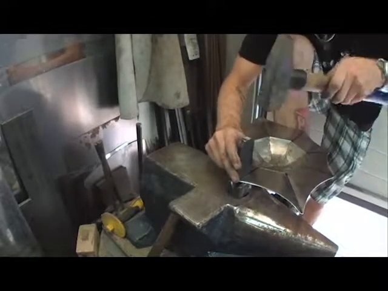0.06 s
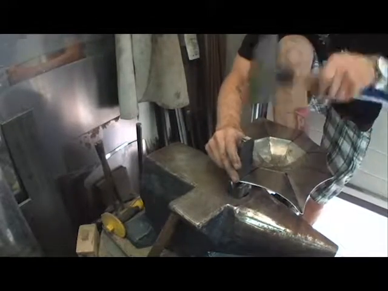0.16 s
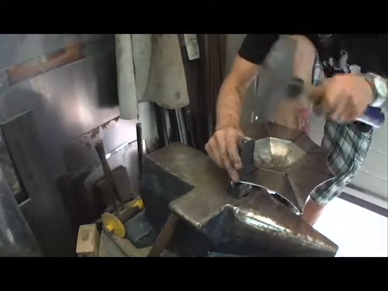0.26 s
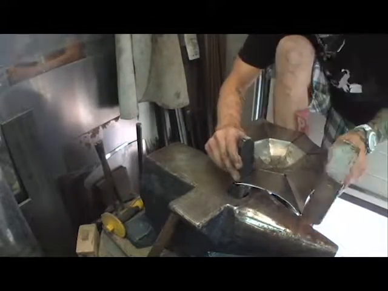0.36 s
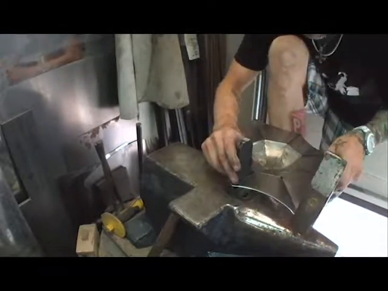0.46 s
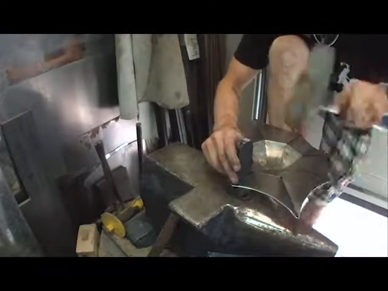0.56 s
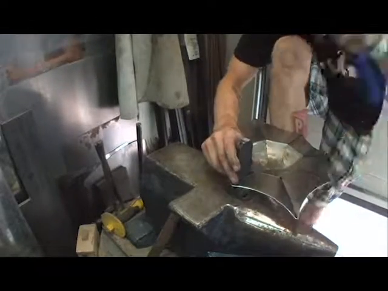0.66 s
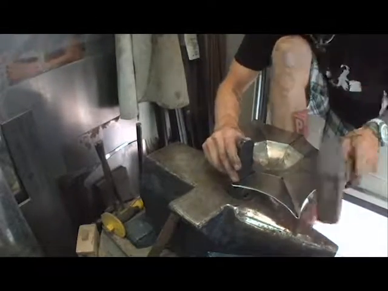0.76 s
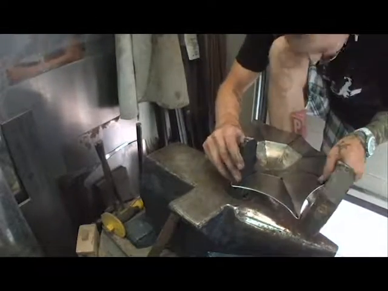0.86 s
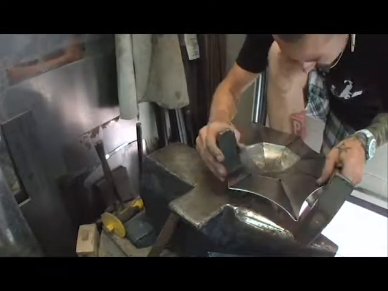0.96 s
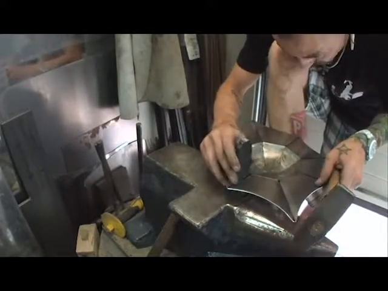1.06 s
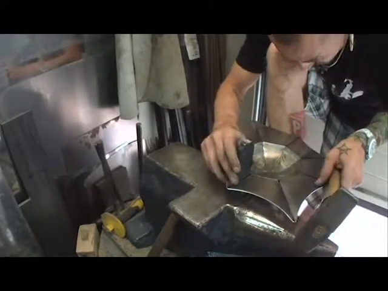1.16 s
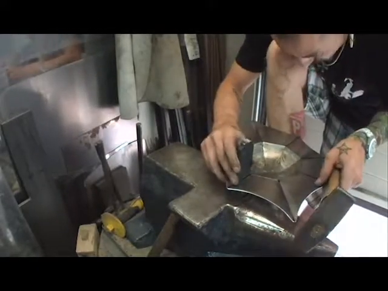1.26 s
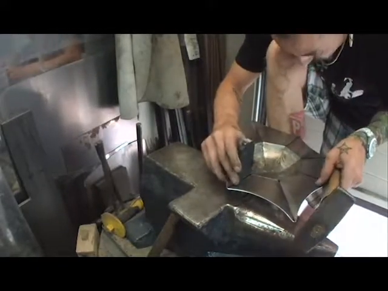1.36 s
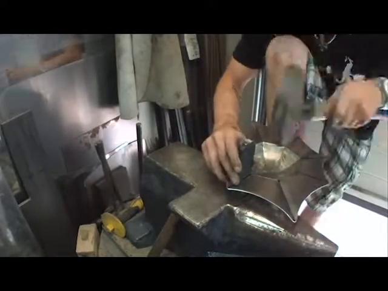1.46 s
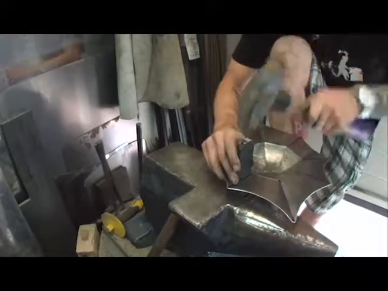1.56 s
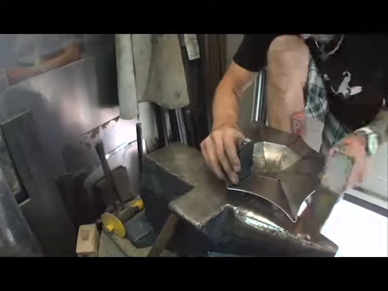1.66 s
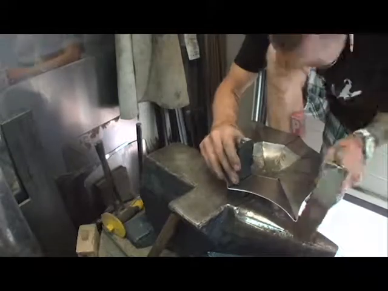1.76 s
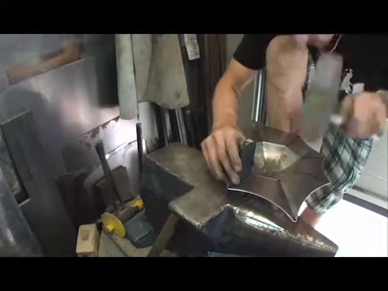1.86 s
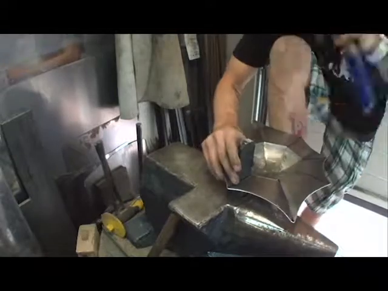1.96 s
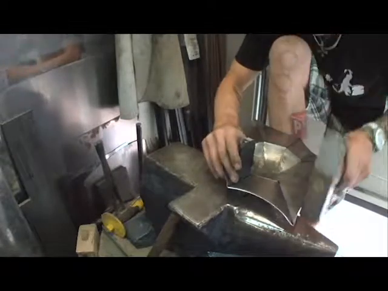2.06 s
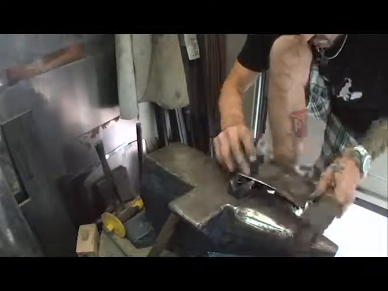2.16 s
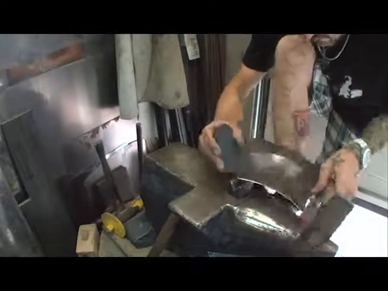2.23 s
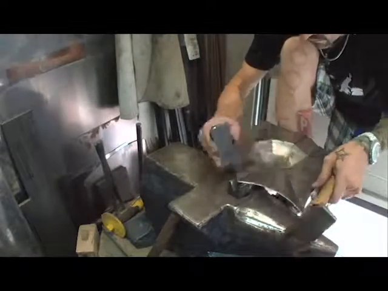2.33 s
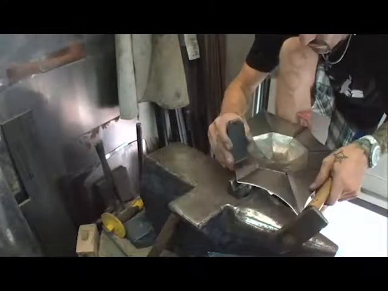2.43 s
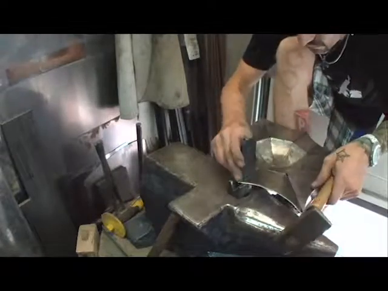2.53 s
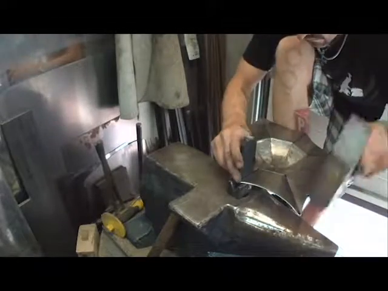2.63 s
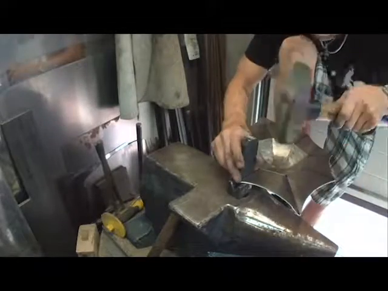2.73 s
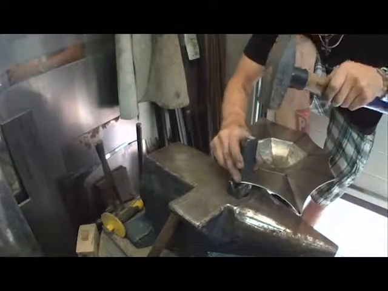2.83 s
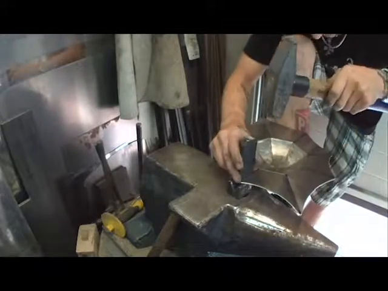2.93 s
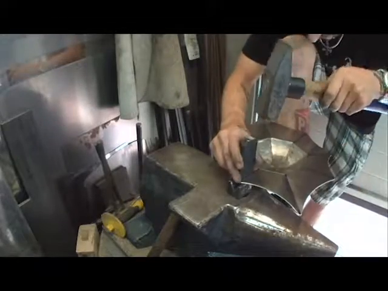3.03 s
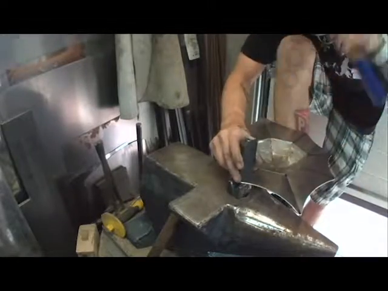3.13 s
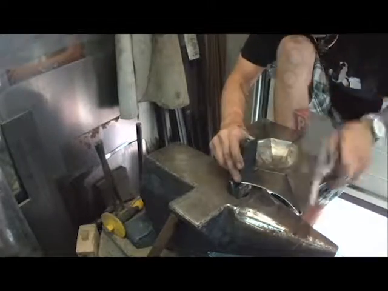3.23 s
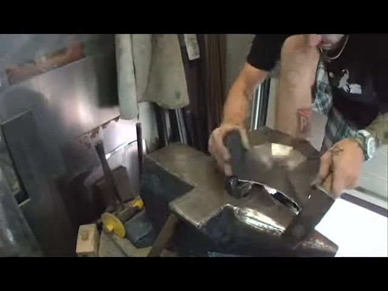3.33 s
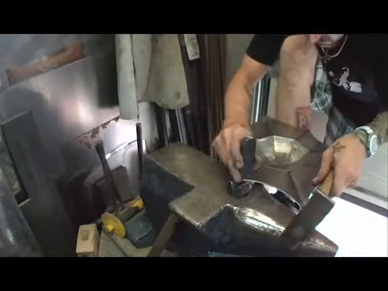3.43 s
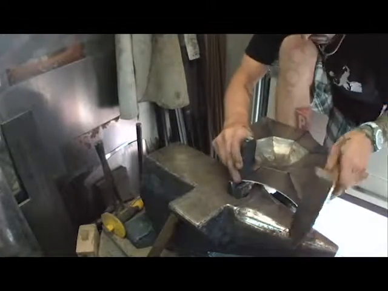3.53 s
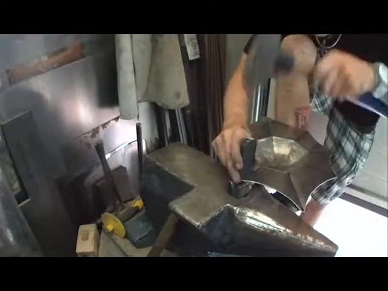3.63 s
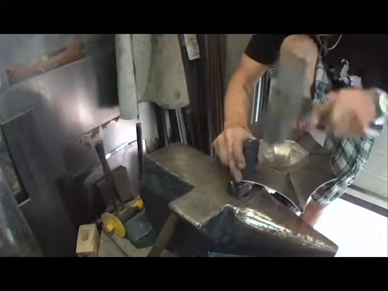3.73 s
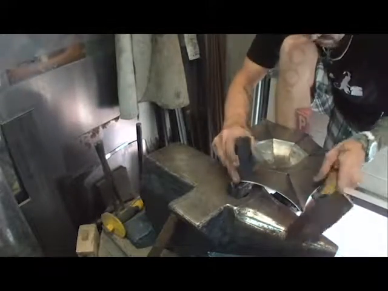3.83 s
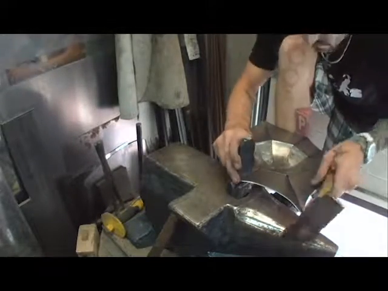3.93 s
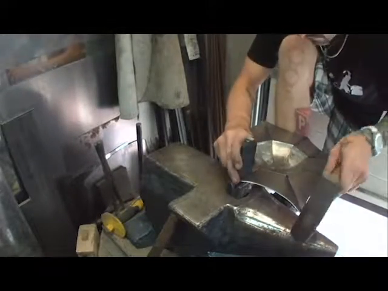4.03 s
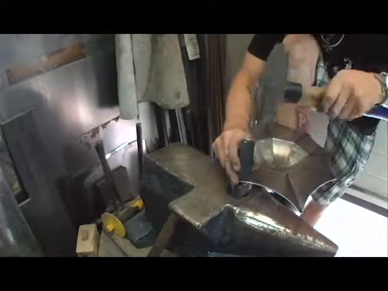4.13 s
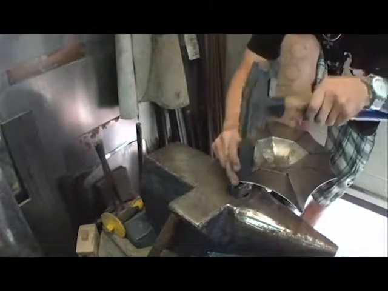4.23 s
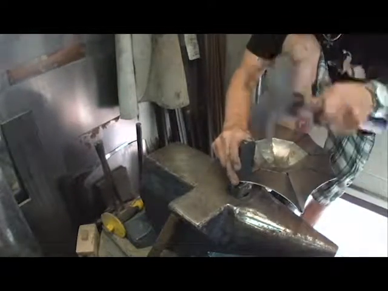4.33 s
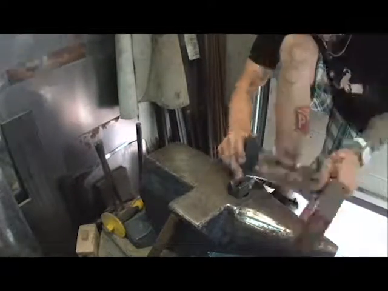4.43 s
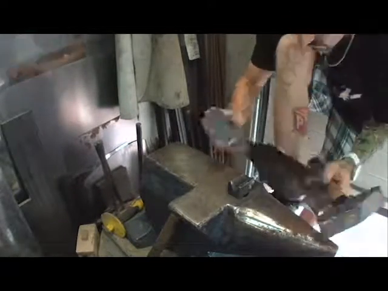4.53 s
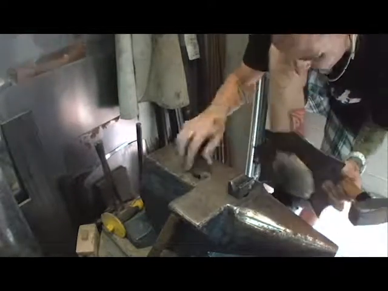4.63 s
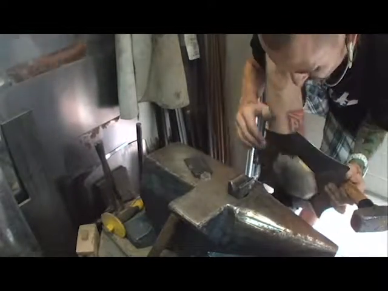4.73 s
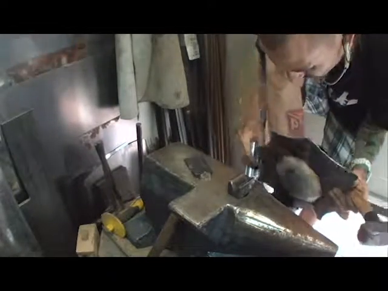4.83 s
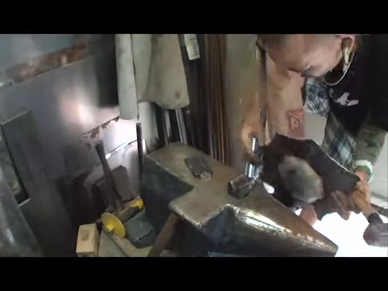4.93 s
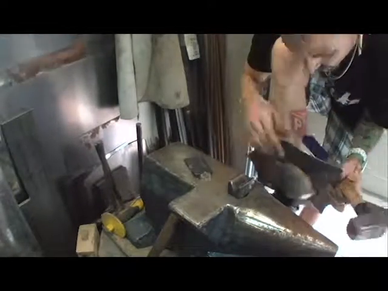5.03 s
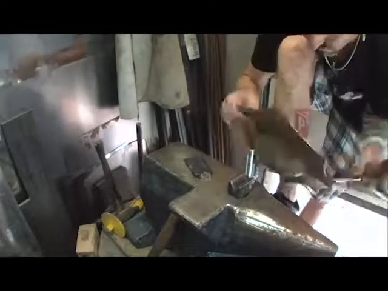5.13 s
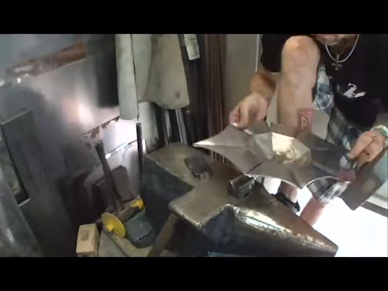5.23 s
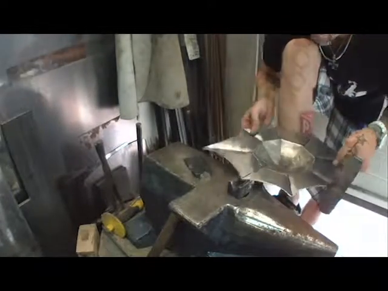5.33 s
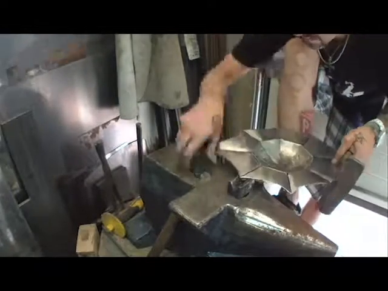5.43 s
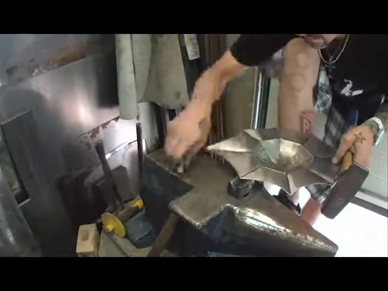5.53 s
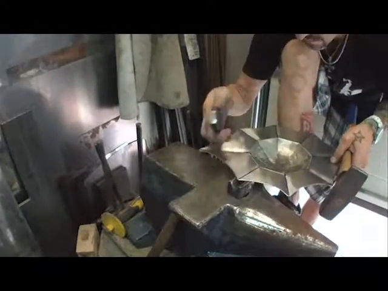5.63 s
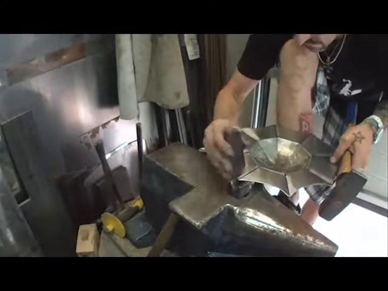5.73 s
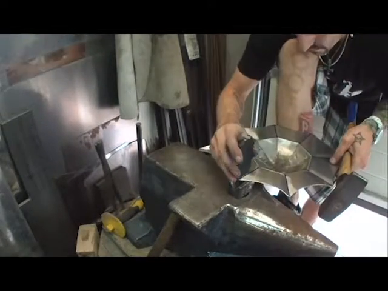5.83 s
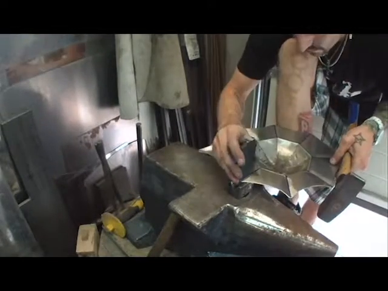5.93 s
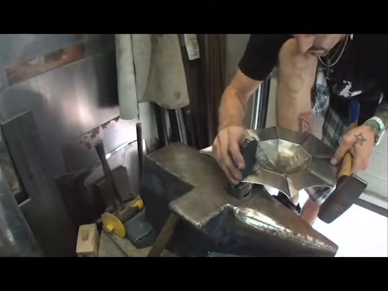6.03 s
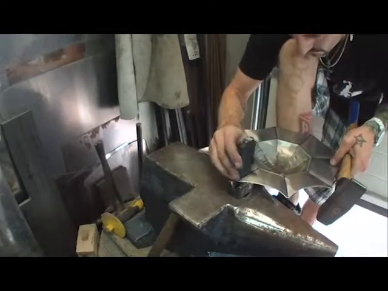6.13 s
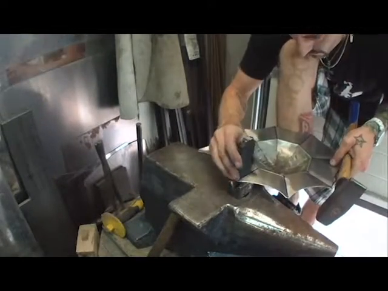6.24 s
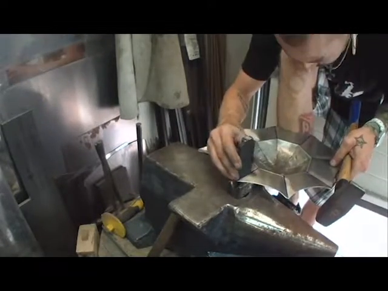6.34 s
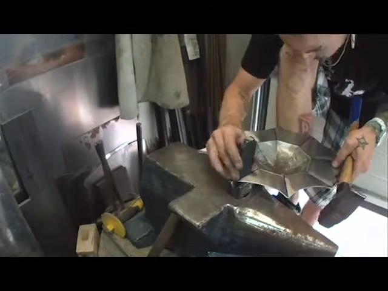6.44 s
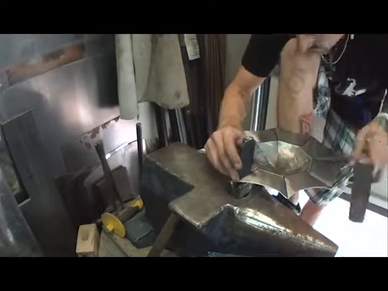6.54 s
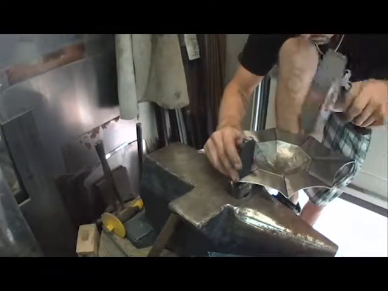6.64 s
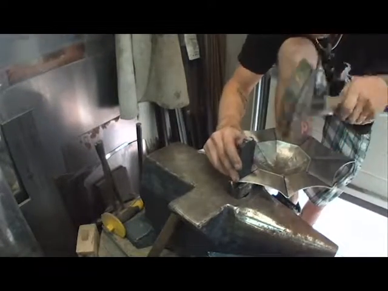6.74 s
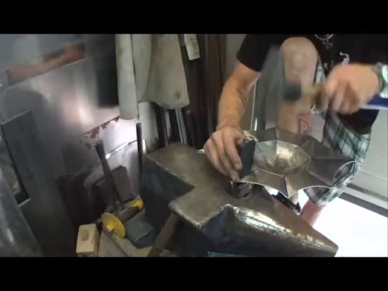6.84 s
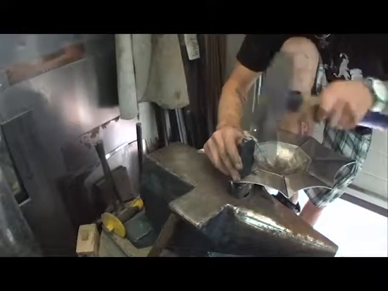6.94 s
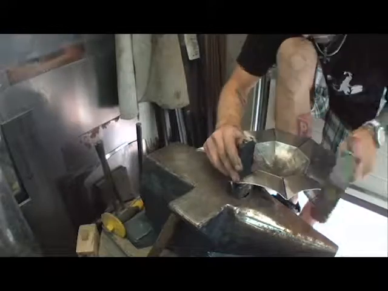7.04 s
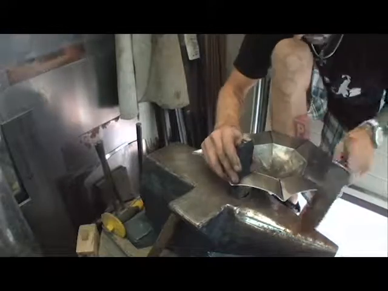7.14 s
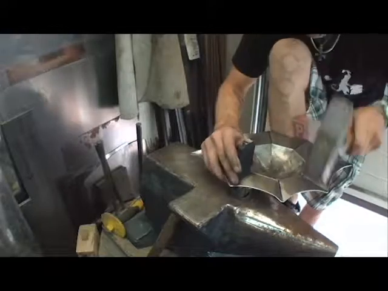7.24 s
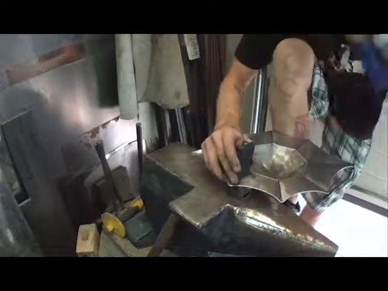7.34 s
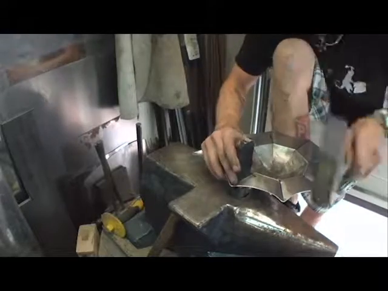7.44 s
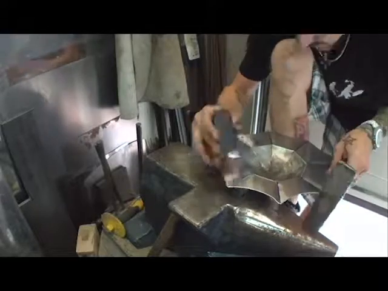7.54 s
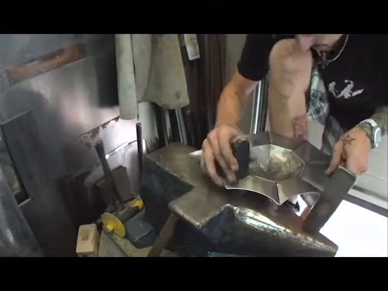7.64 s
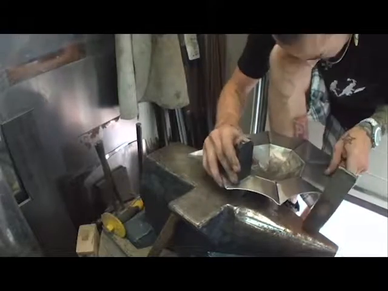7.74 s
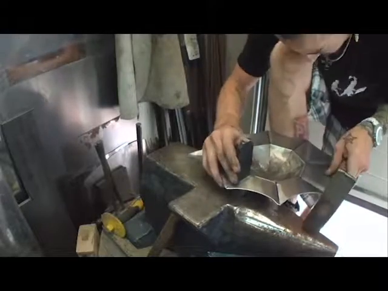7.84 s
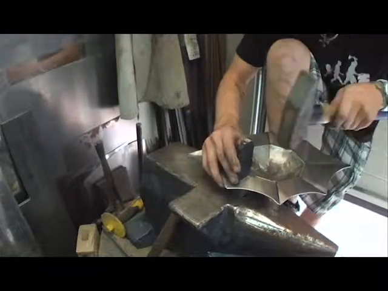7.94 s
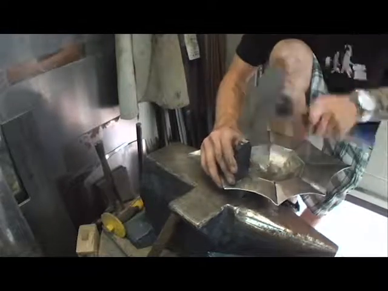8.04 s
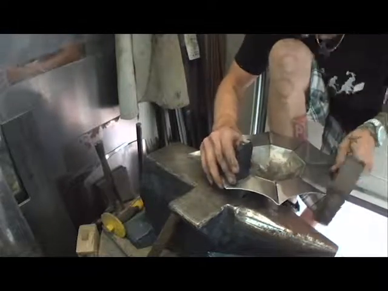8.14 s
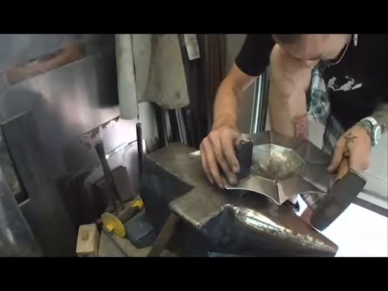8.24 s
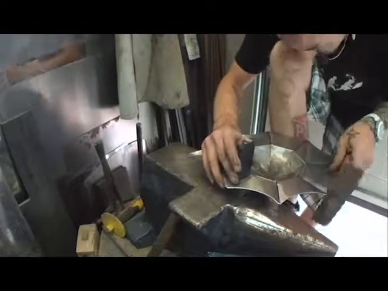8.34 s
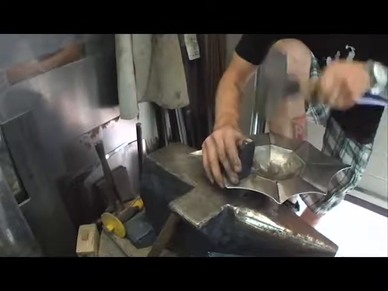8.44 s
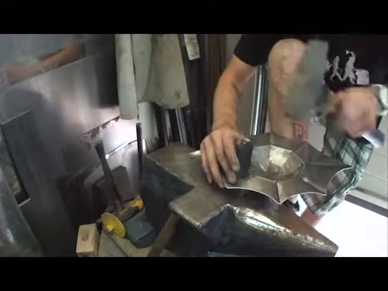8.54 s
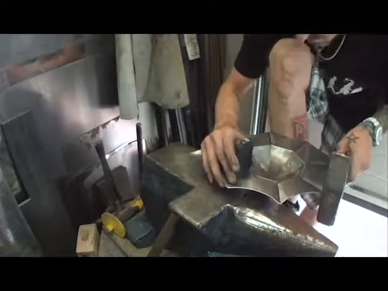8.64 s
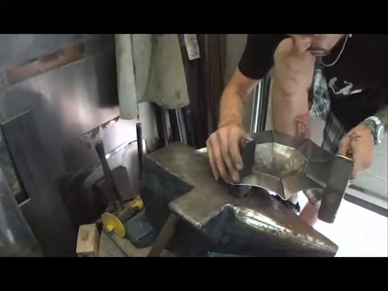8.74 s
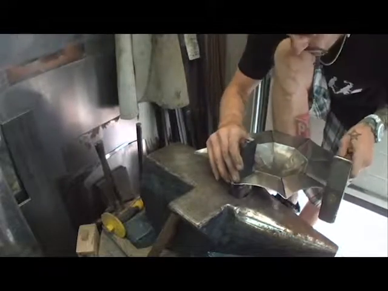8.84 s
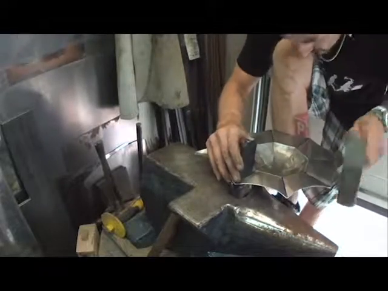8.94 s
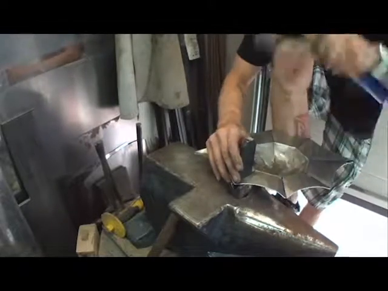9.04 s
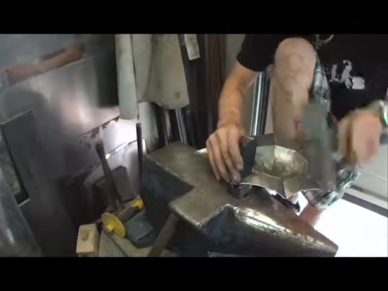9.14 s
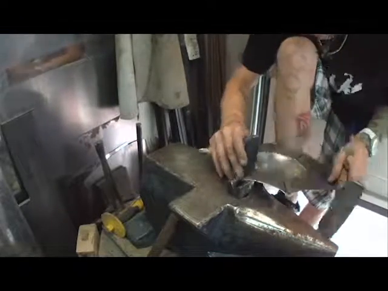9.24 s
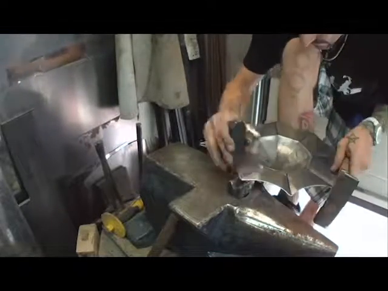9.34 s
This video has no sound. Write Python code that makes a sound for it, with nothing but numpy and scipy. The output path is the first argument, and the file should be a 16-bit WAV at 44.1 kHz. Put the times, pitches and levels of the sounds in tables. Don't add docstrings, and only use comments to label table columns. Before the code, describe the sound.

Irregular loud metal strikes in a small workshop: a dry, crunchy, flattened attack, a dense tinny sheet rattle, a short low thud from the anvil's stump and a faint lingering ring. Lighter clinks from the rebounding punch fill the gaps. Midway the hammering pauses for handling ticks and a brief, faint machine hum, then resumes. The microphone is close and overloading; quiet broadband air lies behind.

```python
import sys
import numpy as np
from scipy import signal
from scipy.fft import rfft, irfft, next_fast_len
from scipy.io import wavfile
from scipy.ndimage import uniform_filter1d, map_coordinates

SR = 44100
rng = np.random.default_rng(int(sys.argv[2]) if len(sys.argv) > 2 else 0)


def persist_wave(psi):
    counts = np.round(np.clip(psi, -1, 1) * 32767).astype(np.int16)
    wavfile.write(sys.argv[1], SR, np.atleast_2d(counts).T)


def volts_from_db(level):
    exponent = np.asarray(level, float) / 20
    return 10 ** exponent


N = 414079


def unit(x):
    return x / np.sqrt(np.mean(x ** 2) + 1e-20)


def along(points, hz):
    f, v = np.transpose(points)
    return np.interp(np.log(hz + 1), np.log(f + 1), v)


def filtered(x, response):
    m = next_fast_len(N + 8192)
    return irfft(rfft(x, m) * response(np.fft.rfftfreq(m, 1 / SR)), m)[..., :N]


def add(track, s, x):
    part = track[round(s * SR):][:len(x)]
    part += x[:len(part)]


def ring(hz, db, t60, t, rough, attack):
    steps = rng.standard_normal((len(hz), len(t)))
    phase = rough * np.cumsum(steps, axis=1) + 2 * np.pi * rng.random((len(hz), 1))
    decay = volts_from_db(db[:, None] - 60 * t / t60[:, None])
    waves = decay * np.sin(2 * np.pi * hz[:, None] * t + phase)
    return waves.sum(0) * (1 - np.exp(-t / attack))


def single_ring(hz, db, t60, t, rough, attack):
    return ring(*np.c_[[hz, db, t60]], t, rough, attack)


# (frequency [Hz], density [dB per Hz])
AIR_COLOUR = [(12, -33), (20, -12), (22, -26.5), (33, -22), (93, -19.5), (241, -23.5), (293, -24),
              (357, -27), (527, -29.5), (574, -30.5), (698, -31), (1120, -35.5), (2460, -41),
              (16000, -52.5)]
AIR_DB = -48.5
# (frequency [Hz], width [Hz], level [dB])
DRONES = [
    (173, 23, -63.5),
    (720.6, 8.1, -64.5),
]


def workshop():
    z = signal.stft(rng.standard_normal(N + 512), nperseg=512)[2]
    patches = uniform_filter1d(rng.standard_normal(z.shape), 6, 0)
    patches = uniform_filter1d(patches, 12, 1)
    noise = signal.istft(z * volts_from_db(1.1 * unit(patches)), nperseg=512)[1][:N]
    air = volts_from_db(AIR_DB) * unit(filtered(noise, lambda hz: volts_from_db(along(AIR_COLOUR, hz))))
    for mid_hz, width_hz, db in DRONES:
        drone = filtered(rng.standard_normal(N), lambda hz: 1 / (1 + ((hz - mid_hz) / width_hz) ** 2))
        air += volts_from_db(db) * unit(drone)
    return air


# (time [s], length [s], level [dB])
HUM = [
    (5.272, 0.39, -58.5),
    (5.6, 0.39, -50),
    (6.199, 0.525, -54.5),
]
HUM_FREE_HZ, HUM_LOADED_HZ, HUM_SAG_S = 311, 299, 0.128
HUM_FADE_S, HUM_FLUTTER_DB = 0.023, -3


def machine():
    out, t = np.zeros(N), np.arange(SR) / SR
    for s, length_s, db in HUM:
        hz = HUM_LOADED_HZ + (HUM_FREE_HZ - HUM_LOADED_HZ) * np.exp(-(t / HUM_SAG_S) ** 2)
        swell = np.clip(np.minimum(t, length_s - t) / HUM_FADE_S, 0, 1)
        flutter = map_coordinates(rng.standard_normal(size=20), [12 * t])
        tone = np.sqrt(2) * np.sin(2 * np.pi * np.cumsum(hz) / SR)
        add(out, s, volts_from_db(db + HUM_FLUTTER_DB * flutter) * swell * tone)
    return out


# (frequency [Hz], t60 [s])
SHOP_T60 = [(200, 0.32), (1500, 0.72), (5000, 0.37), (14000, 0.18)]


def reverb(x, wet_db):
    hz, t, z = signal.stft(rng.standard_normal(SR // 2), SR, nperseg=256)
    decay = volts_from_db(-60 * t / along(SHOP_T60, hz)[:, None])
    tail = signal.istft(z * decay, SR, nperseg=256)[1]
    tail = volts_from_db(wet_db) * tail / np.linalg.norm(tail)
    wet = signal.fftconvolve(np.pad(x, (200, 0)), tail)
    wet[:len(x)] += x
    return wet


# (frequency [Hz], level [dB])
SHEET_COLOUR = [(180, -12), (300, -7.5), (700, -5), (1030, 0), (1530, -5), (1780, -4.5), (2650, -3),
                (5340, -4), (6960, -7), (7440, -4), (9550, 0.5), (14000, -8.5), (15700, -4.5)]
# (frequency [Hz], t60 [s])
SHEET_T60 = [(400, 0.099), (1500, 0.13), (4000, 0.11), (9000, 0.095), (15000, 0.1)]


def sheet(t, body_db, bright_db, damping, lumpy_db, attack):
    hz, when, z = signal.stft(rng.standard_normal(len(t)), SR, nperseg=256)
    bands = unit(uniform_filter1d(rng.standard_normal(len(hz)), size=2))
    shelves = along([(1500, body_db), (2600, 0), (5500, 0), (8000, bright_db)], hz)
    colour = unit(volts_from_db(along(SHEET_COLOUR, hz) + shelves + lumpy_db * bands))
    decay = volts_from_db(-60 * when / (damping * along(SHEET_T60, hz))[:, None])
    chatter = signal.istft(z * colour[:, None] * decay, SR, nperseg=256)[1][:len(t)]
    return chatter * (1 - np.exp(-t / attack))


# (time [s], peak [dB], sharpness [dB], ping re peak [dB])
BOUNCES = [(1.033, -20, 5.5, -12), (1.8086, -29, 2, -12.5), (2.1015, -6.5, 1, -7), (2.126, -16, -2.5, -10),
           (2.3829, -18, 0.5, -17), (2.498, -13.5, 3, -21), (2.533, -30, -2.5, -10),
           (3.2718, -23.5, -1, -10), (3.2974, -31.5, -5, -2.5), (3.3764, -30, -2.5, -7.5),
           (3.794, -25.5, -1.5, -13.5), (3.8716, -24.5, -7.5, -23), (3.933, -21, 0.5, -6.5),
           (4.2352, -7, 0, -10.5), (4.4378, -13.5, -5, -9.5), (4.4675, -21.5, -6, -13),
           (4.5198, -24.5, 14, -15), (5.2992, -32, -2, -1), (5.3074, -19.5, 1, -10.5),
           (5.8315, -30, -5, -9.5), (7.0298, -27, -0.5, -10), (7.622, -20.5, 5.5, -12),
           (8.149, -32, -2.5, -5), (8.6303, -24, 1, -12)]
# (frequency [Hz], frequency [Hz], frequency [Hz])
BOUNCE_HZ = [(2690, 9520, 5500), (2690, 4380, 9500), (4190, 4750, 3460), (3310, 4110, 9260),
             (1920, 4020, 2640), (2680, 9140, 1870), (2290, 1330, 2680), (2590, 3820, 9400),
             (2300, 3730, 8700), (2310, 1350, 9400), (2560, 3460, 1400), (1420, 2300, 11670),
             (2280, 1100, 3820), (2220, 3830, 960), (11680, 1100, 2120), (11670, 4200, 9300),
             (11540, 10380, 8600), (9360, 8700, 2430), (3170, 2560, 5800), (1040, 3600, 9840),
             (1740, 3430, 2600), (3400, 4390, 1870), (3630, 2730, 1800), (3600, 2870, 4400)]
# (time [s], peak [dB], sharpness [dB], ping frequency [Hz], ping level [dB])
TICKS = [(0.4392, -38, -2, 2560, -54), (5.4066, -51, -5, 3360, -50), (8.8508, -50, -1, 4300, -51),
         (1.7417, -36, 8, 2680, -61), (2.4187, -35.5, 0, 2640, -49), (2.621, -43, -2, 2420, -59),
         (3.408, -30.5, -3, 2580, -46), (3.5, -54, -4, 1580, -45.5), (3.5506, -41, 5, 2360, -49),
         (4.499, -36, 10, 2530, -45), (5.2387, -32, -3.5, 5820, -49), (5.358, -40, 15, 2440, -47),
         (5.4065, -32.5, -6, 2310, -44), (6.3979, -37, -2.5, 2310, -45.5), (7.859, -37, -10, 3630, -53),
         (8.3496, -35, -10, 3630, -49), (8.6778, -38, -2, 1735, -47), (8.8503, -37.5, -2.5, 3430, -49),
         (9.2706, -29.5, -2, 2440, -47.5)]
# (time [s], peak [dB], sharpness [dB])
SCUFFS = [(1.4112, -37, -3), (2.175, -32, -2), (2.2414, -36, -2), (2.3088, -37, -3), (3.478, -39, -6),
          (3.922, -30, -7), (4.043, -36, -8), (4.4304, -19.5, 12), (4.6102, -34.5, 15), (4.6694, -40.5, 11),
          (5.321, -22.5, 10), (5.4842, -39, 10), (9.2312, -32, -6), (9.3434, -35, -6), (9.3792, -38.5, -7)]
# (frequency [Hz], t60 [s])
PING_T60 = [(2400, 0.073), (2685, 0.13), (3000, 0.068), (10000, 0.1)]
PING_STEP_DB = -3.5
TAP_BODY_DB, TAP_BRIGHT_DB, TAP_DAMPING = 0.5, -7.5, 0.73
TAP_LOW_HZ = 850
GAP_HZ, GAP_WIDE_HZ, GAP_DB = 6820, 710, 10
TAP_LEAD_S = 0.0008


def tap_response(hz):
    bass_loss = (1j * hz / (TAP_LOW_HZ + 1j * hz)) ** 3
    return bass_loss * volts_from_db(-GAP_DB * np.exp(-((hz - GAP_HZ) / GAP_WIDE_HZ) ** 2))


def taps():
    out, t = np.zeros(N), np.arange(SR // 6) / SR
    for s, db, sharp_db, *_ in BOUNCES + TICKS + SCUFFS:
        body_db = TAP_BODY_DB - 2.0 * sharp_db
        bright_db = TAP_BRIGHT_DB + 0.68 * sharp_db
        rattle = sheet(t, body_db, bright_db, TAP_DAMPING, lumpy_db=2.5, attack=0.0007)
        click = sheet(t, -2.0, -1.0, 1.5, lumpy_db=-0.5, attack=0.00028)
        click *= volts_from_db(0.87 * bright_db + 4.5 - 60 * t / 0.013)
        add(out, s - TAP_LEAD_S, reverb(volts_from_db(db - 7) * (rattle + click), wet_db=-21))
    out = filtered(out, tap_response)

    pings = [(s, hz, ping_db + 5.0) for s, _, _, hz, ping_db in TICKS]
    for (s, db, _, ping_db), tones in zip(BOUNCES, BOUNCE_HZ):
        pings += [(s, hz, db + ping_db + PING_STEP_DB * k) for k, hz in enumerate(tones)]
    for s, hz, db in pings:
        rough = 0.024 * np.sqrt(hz / 4000)
        add(out, s - TAP_LEAD_S, single_ring(hz, db, along(PING_T60, hz), t, rough, attack=0.00035))
    return out


# (frequency [Hz], level re rattle [dB])
FIRST_GRIP = [(4050, -22), (2560, -19), (2680, -21), (3190, -19), (3790, -22), (4820, -18), (5200, -18),
              (7760, -20), (9930, -18), (10400, -17), (11420, -22), (12900, -22), (15250, -24)]
# (frequency [Hz], level re rattle [dB])
SECOND_GRIP = [(2680, -20), (2960, -21), (3300, -21), (3590, -20), (4300, -18), (4750, -19), (5210, -17),
               (7480, -17), (8510, -17), (9660, -15), (10200, -19), (10380, -19), (13300, -23),
               (15250, -23)]
TURN_S, GRIP_SCATTER_DB, DETUNE = 5.3, 3.5, 0.012


def gripped_modes(s, lead_hz, lead_db):
    free_hz, free_db = np.transpose(FIRST_GRIP if s < TURN_S else SECOND_GRIP)
    hz = np.r_[free_hz * (1 + DETUNE * rng.standard_normal(len(free_hz))), lead_hz]
    db = np.r_[free_db + GRIP_SCATTER_DB * rng.standard_normal(len(free_hz)), lead_db]
    return hz, db + 6.0 + 1.2 * np.log2(hz / 5000)


# (time [s], strength [dB], body [dB], brightness [dB], head ring [dB])
BLOWS = [(0.237, -9, 3, 2.8, -55), (0.692, -7.5, -0.5, -0.3, -50), (1.573, -6, -2, -0.5, -48),
         (2.0001, -4.5, -3, -0.5, -44), (3.167, -8, -4, -1.8, -46), (3.694, -12.5, -0.5, -0.2, -51),
         (4.3148, -11, 0, 1.7, -40), (6.915, -9.5, 0.5, 1, -53), (7.384, -5.5, -2.3, 0, -48),
         (8.0466, -6, -1.5, -0.6, -50), (8.5115, -5, -3.6, -1, -61), (9.0984, -9, -2.5, -1.5, -45)]
# (frequency [Hz], frequency [Hz], frequency [Hz])
LEAD_HZ = [(1780, 9650, 7900), (9390, 10010, 3760), (9390, 10200, 2680), (2680, 9400, 4760),
           (3830, 3200, 10510), (3170, 1780, 4050), (3750, 1020, 7760), (10350, 2600, 3290),
           (8540, 9450, 10700), (8540, 3590, 13280), (10200, 3590, 2960), (2600, 3460, 3800)]
# (level [dB], level [dB], level [dB])
LEAD_DB = [(-16.5, -19, -16), (-11, -15, -17), (-8.5, -10, -11), (-10, -6, -8), (-11.5, -20, -25),
           (-10, -22, -18.5), (-7, -20.5, -38), (-11, -15.5, -16.5), (-7.5, -9, -20), (-11, -12, -13),
           (-6.5, -9, -19), (-12.5, -6, -12.5)]
# (frequency [Hz], t60 [s])
GRIP_T60 = [(1000, 0.13), (2200, 0.18), (2680, 0.1), (3300, 0.08), (8000, 0.092), (15000, 0.094)]
# (frequency [Hz], level [dB], t60 [s])
STUMP = [
    (168.4, -16.5, 0.11),
    (303, -26, 0.17),
    (589, -36.5, 0.32),
]
# (frequency [Hz], level [dB], t60 [s])
ANVIL = [
    (1687, -43.5, 0.5),
    (2120, -51.5, 1),
    (2440, -53.5, 1),
    (5140, -58.5, 0.87),
]
# (time [s], frequency [Hz], level [dB], t60 [s])
GLANCES = [
    (2.0002, 9445, -41, 0.43),
    (8.048, 9660, -47, .86),
    (8.512, 9660, -46, 0.78),
]
HEAD_HZ, HEAD_T60_S = 3740, 1.0
DAMPING = 0.85
BUILD, BUILD_S = 0.66, 0.026
LINGER_DB, LINGER = -37.5, 3.8


def hammer():
    out, t, long_t = np.zeros(N), np.arange(SR // 4) / SR, np.arange(SR // 2) / SR
    for (s, db, body_db, bright_db, head_db), lead_hz, lead_db in zip(BLOWS, LEAD_HZ, LEAD_DB):
        hz, mode_db = gripped_modes(s, lead_hz, lead_db)
        loose = np.sqrt(hz / 5000)[:, None]
        t60 = DAMPING * along(GRIP_T60, hz)
        rattle = sheet(t, body_db, bright_db, DAMPING, lumpy_db=1.84, attack=0.00061)
        modes = ring(hz, mode_db, t60, t, rough=0.04 * loose, attack=0.0013)
        thud = ring(*np.transpose(STUMP), t, rough=0.004, attack=0.019)
        build = 1 - BUILD * np.exp(-t / BUILD_S)
        add(out, s, reverb(volts_from_db(db + 11) * build * (rattle + modes + thud), wet_db=-29.5))

        linger_db = db + mode_db + LINGER_DB - 2.5 * np.log2(hz / 5000)
        linger_db += 3 * rng.standard_normal(len(hz))
        add(out, s, ring(hz, linger_db, LINGER * t60, long_t, rough=0.016 * loose, attack=0.003))
        add(out, s, ring(*np.transpose(ANVIL), long_t, rough=0.003, attack=0.003))
        add(out, s, single_ring(HEAD_HZ, head_db - 3, HEAD_T60_S, long_t, rough=0.008, attack=0.003))
    for s, hz, db, t60 in GLANCES:
        add(out, s, single_ring(hz, db - 3, t60, long_t, rough=0.008, attack=0.003))
    return out


def scene():
    return (workshop() + machine() + taps() + hammer())[None]


def roll_off(x):
    return signal.sosfilt(signal.butter(12, 17130, fs=SR, output="sos"), x)


OFFSET, TOP_HZ = 0.0361, 15950
LIMIT_LEVEL, CLIP_LEVEL = 0.24, 0.6


def record(dry):
    level = np.sqrt(np.abs(uniform_filter1d(dry ** 2, size=130, axis=1)))
    x = (dry + OFFSET) / (1 + (level / LIMIT_LEVEL) ** 3) ** (1 / 3)
    x = x / (1 + np.abs(x / CLIP_LEVEL) ** 6) ** (1 / 6)
    mix = filtered(x, lambda hz: volts_from_db(-21 * (1 + np.tanh((hz - TOP_HZ) / 90))))
    return roll_off(mix)


dry = scene()
out = record(dry)
persist_wave(out)
```